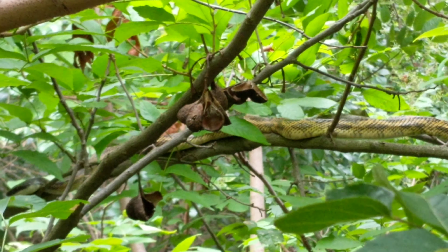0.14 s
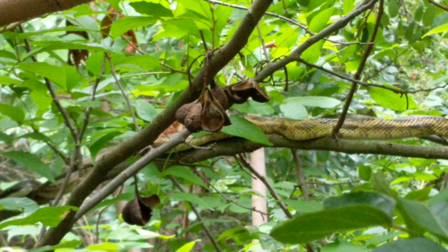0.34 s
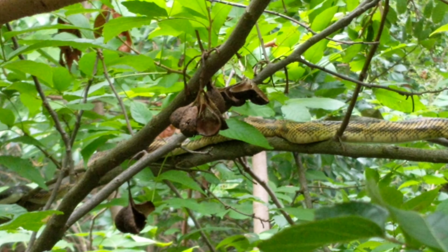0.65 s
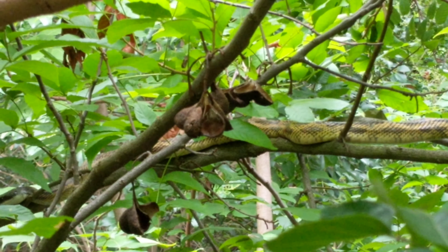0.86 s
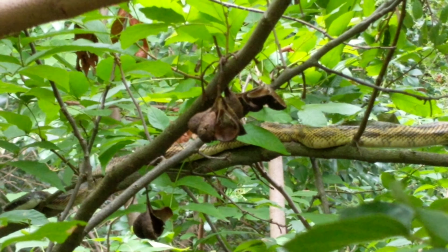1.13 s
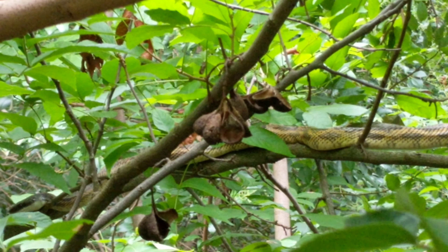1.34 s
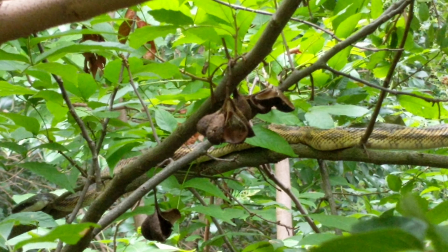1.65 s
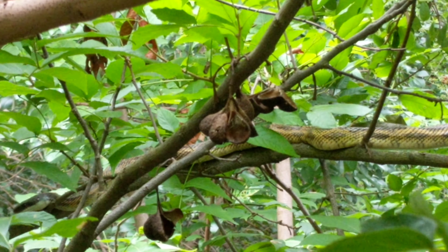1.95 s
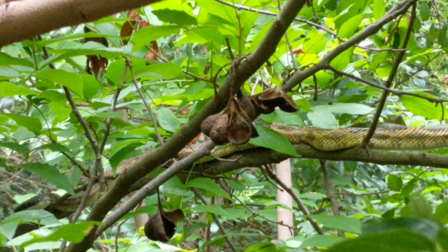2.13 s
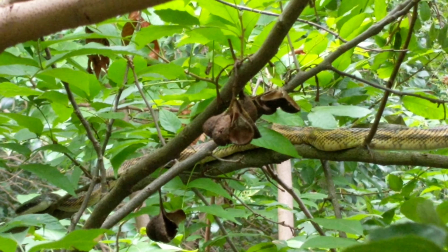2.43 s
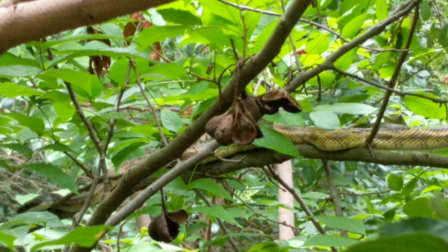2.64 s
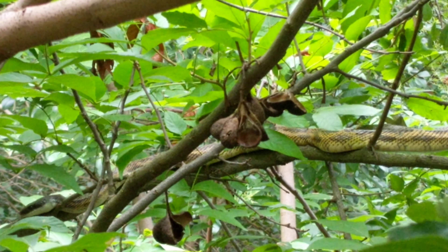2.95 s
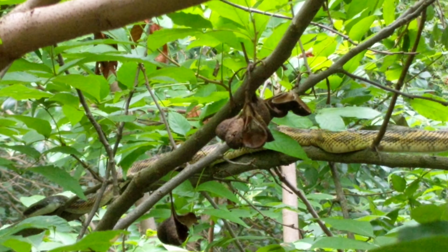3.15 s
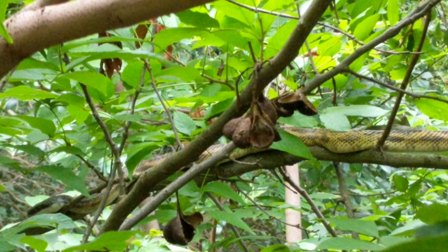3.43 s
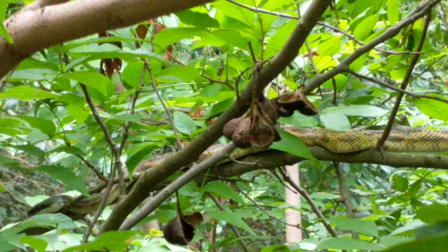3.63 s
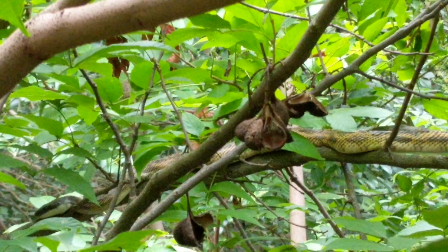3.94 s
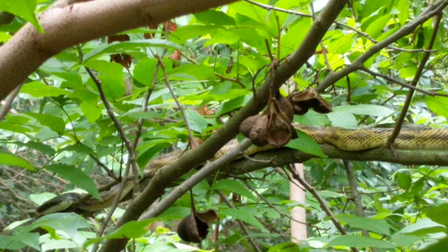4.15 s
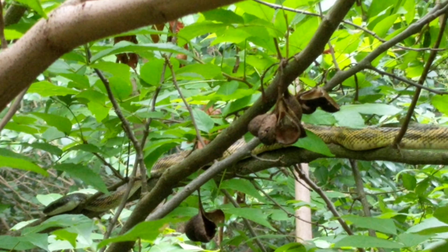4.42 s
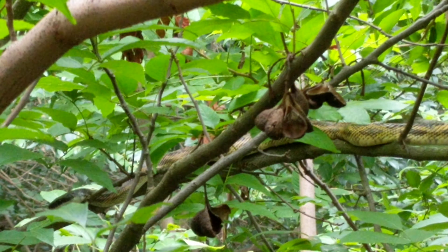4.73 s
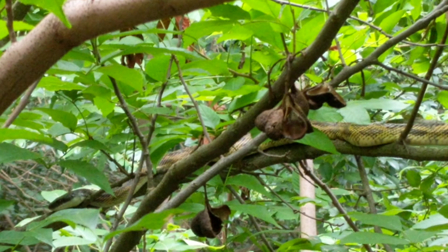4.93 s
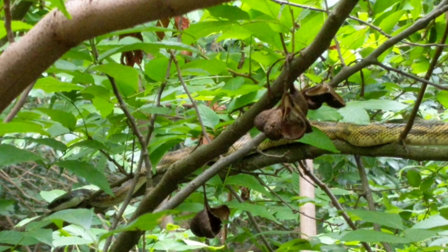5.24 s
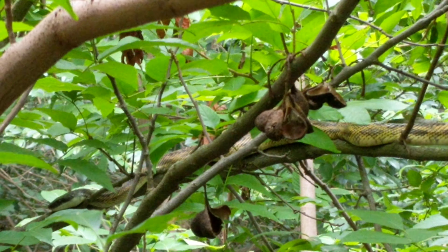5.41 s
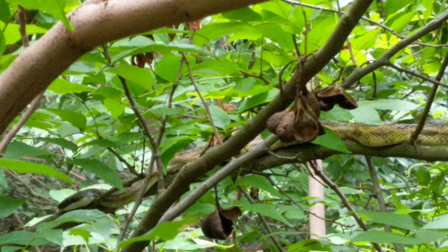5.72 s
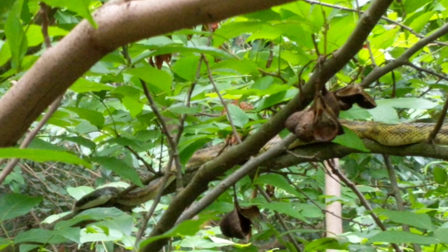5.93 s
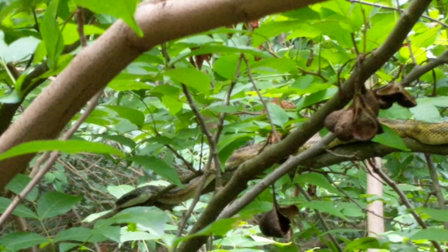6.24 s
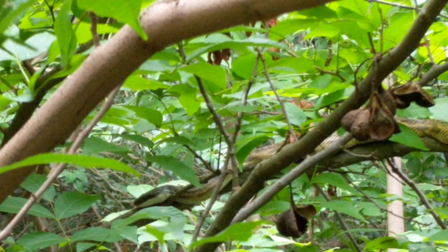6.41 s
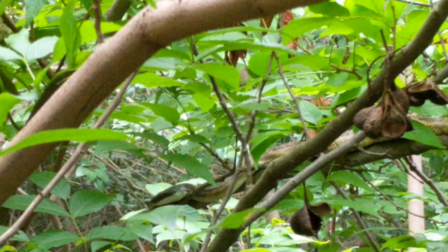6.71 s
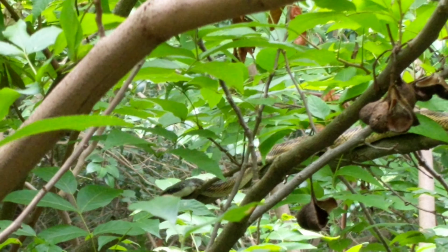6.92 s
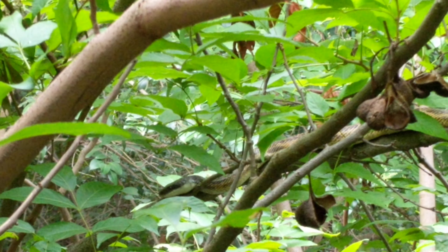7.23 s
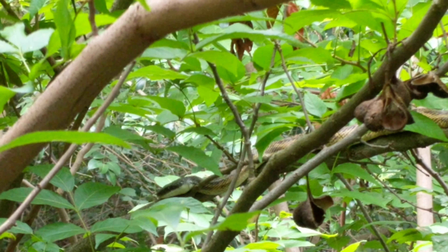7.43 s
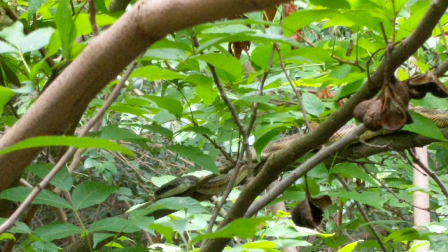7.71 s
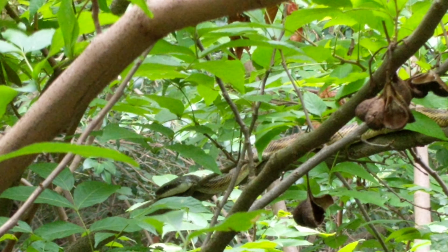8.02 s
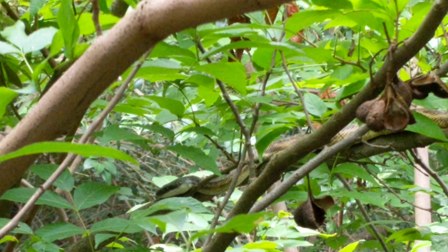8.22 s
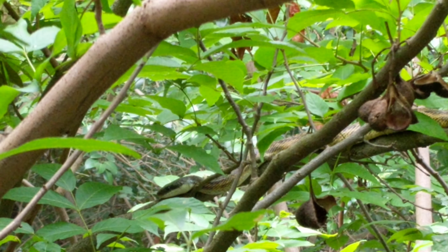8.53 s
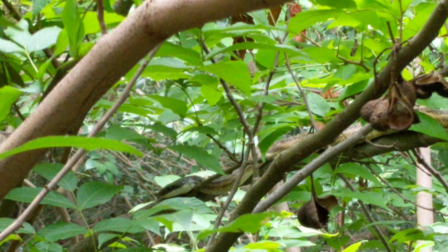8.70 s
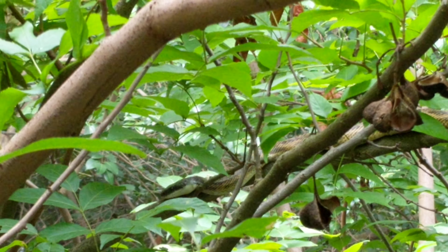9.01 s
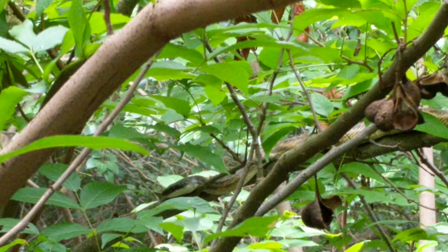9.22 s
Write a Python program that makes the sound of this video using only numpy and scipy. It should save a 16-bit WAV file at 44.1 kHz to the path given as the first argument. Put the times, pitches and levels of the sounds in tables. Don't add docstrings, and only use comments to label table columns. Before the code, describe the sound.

Two jays scold with harsh, raspy screeches in a leafy wood, one near and one farther, over faint distant rumble and insect hiss.

```python
import sys
import numpy as np
from scipy import signal
from scipy.fft import rfft, irfft
from scipy.io import wavfile
from scipy.ndimage import uniform_filter1d

SR = 44100
rng = np.random.default_rng(int(sys.argv[2]) if len(sys.argv) > 2 else 0)


def master(y):
    cut = np.clip(np.atleast_2d(y).T, -1, 1)
    pcm = np.round(cut * 32767)
    wavfile.write(sys.argv[1], SR, pcm.astype(np.int16))


def makeup_ratio(level_db):
    decades = np.asarray(level_db, float) / 20
    return 10 ** decades


N = 412776

# (start [s], length [s], effort [dB], brightness [dB], hoarseness [dB])
NEAR_CALLS = [
    (-0.14, .395, -27, -8, 8.5),
    (0.655, 0.38, -36, 4, 2.5),
    (2.49, .385, -29, -3, -15),
    (7.26, .455, -32, -8, 8.5),
]
FAR_CALLS = [(0.31, .40, -32.5, 1, 0), (0.93, .41, -34, 2, 0), (2.165, 0.41, -33, 0, 0),
             (2.89, 0.42, -31, -1, 0), (3.487, 0.39, -30.5, -2, 0), (4.172, 0.38, -31, -3, 0),
             (5.011, 0.37, -30.5, -6, 0.004), (6.83, .455, -31.5, -2.5, 0), (7.46, 0.4, -30.5, -2.5, 0),
             (8.155, 0.43, -31.5, -2, 0.0023), (8.822, 0.42, -32.5, -1.5, 0.0039)]
# (top pitch [Hz], membranes slacken after [ms], slack pitch [Hz], last pitch [Hz],
# fourth partial's change by the end [dB])
NEAR_TUNES = [(771, 250, 687, 655, -2.5), (756.5, 240, 690, 652, -2.5), (767, 200, 714, 657, -3),
              (772, 150, 712, 676, 3)]
FAR_TUNES = [(749, 145, 645, 597, 1), (758, 150, 650, 592, 3), (742, 115, 640, 580, 6),
             (753, 125, 655, 594, 1.5), (752, 112, 665, 606, 3), (743, 108, 660, 580, -3),
             (744, 112, 650, 585, -10), (734, 130, 635, 593, -12), (757, 175, 730, 632, -5.5),
             (762, 150, 640, 606, -2), (751, 125, 650, 594, -2.5)]
# (first pitch [Hz], rise [s], hold [s], sag [Hz per s], slackening takes [s],
# settling power, closing pitch [Hz], closing lead [s], share of the fade that upper partials gain)
NEAR_PITCH_HABITS = (630, .014, .07, 340, 0.034, 1.05, 618, .04, 0.82)
FAR_PITCH_HABITS = (548, .0145, .055, 380, 0.02225, 1.8, 626, .085, 0.14)
# (time [s], fourth partial [dB], upper partials [dB], odd against even partials [dB],
# rasp [dB])
NEAR_STAGES = [
    [(0, -9, 0, -5, 16), (.014, -1, -1.5, 2, 13), (.045, -4.5, 2, -10.5, 6.5), (.11, 6, 0.1, -8.5, -12)],
    [(0.001, 0.1, -1, -2, -7)],
    [(-.065, -1, -1.5, -4, -5.5), (-.04, -4.5, -2.5, -9, 5.5), (0, -8.5, -10, -4, 6.5)],
]
FAR_STAGES = [
    [(0, -17, -3.5, -19, -6), (.012, -15.5, -11.5, -2, 0), (.026, -6.5, -9.5, -2.5, -3.5), (.05, 0, -13.5, -2, -11.5)],
    [(-.03, -2, -14.5, -16, -10), (.03, -6.5, -11.5, -13, -3), (.11, -9, -8, -7, -7.5)],
    [(-.09, -9.5, -9, 0.1, -5.5), (-.045, -13.5, -14.5, 2.6, 0), (0, -26, -31.5, 3, 0)],
]
# (frequency [Hz], level [dB])
NEAR_THROAT = [(1200.0, -14), (1900.0, -9.5), (2500.0, -2.5), (3200.0, 1.5), (4000.0, -5), (5000.0, -2),
               (6000.0, -4), (7000.0, -7.5), (8500.0, -8), (10500.0, -15.5), (13000.0, -21), (15500.0, -34)]
NEAR_RASP = [(1200.0, -23), (1900.0, -19), (2500.0, -11), (3200.0, -2.5), (4000.0, 0.5), (5000.0, -3.5),
             (6000.0, -6), (7000.0, -6), (8500.0, -1.5), (10500.0, -16), (13000.0, -22), (15500.0, -39)]
FAR_THROAT = [(1200.0, -11), (1900.0, 2), (2500.0, -21), (3200.0, -4.5), (4000.0, -2.5), (5000.0, -1.5),
              (6000.0, -3), (7000.0, -6.5), (8500.0, -10), (10500.0, -17.5), (13000.0, -22), (15500.0, -37)]
FAR_RASP = [(1200.0, -14), (1900.0, -11.5), (2500.0, -1.8), (3200.0, -0.5), (4000.0, -2), (5000.0, -2.5),
            (6000.0, 0), (7000.0, 4), (8500.0, -8), (10500.0, -8), (13000.0, -14), (15500.0, -27)]
# (frequency [Hz], width [Hz], boost [dB])
NEAR_BEAK = [(5542, 470, 11.3), (6660, 770, 8.4)]
FAR_BEAK = [(3550, 130, 0.47), (6040, 290, 1)]
# (frequency [Hz], level [dB])
BEAK_CLOSING = [(1500, 3.5), (2400, 3.5), (3200, 7.5), (4300, 0.5), (5500, -0.5), (7000, -3.5), (12000, 1)]
# (level [dB], ..)
NEAR_PARTIALS = [[1, -1.5, 0, -8.5, -0.78, .4, -2.5, 1.3, -2.2, -1.0, -4.5, 6.2]] * 2
FAR_PARTIALS = [
    [-1.8, 7, 0, 0.7, 1.1, 0.22, -4.5, 6.5, -1.1, 0.66, -.2, 1.3],
    [-0.57, -8, 0, 1.8, 2.3, 0.6, -2, -20, 1.4, 1, -0.37, 0.83],
]
# (start [s], peak [dB], pitch [Hz], lower partial against it [dB])
OPENERS = [(0.3138, -36, 4340, -12), (0.9286, -20, 4600, -22), (2.167, -24.5, 4400, -25),
           (2.8914, -31, 4430, -17), (3.489, -30, 4430, -18), (4.172, -28.5, 4470, -24),
           (5.012, -25, 4430, -12), (6.8332, -35, 4660, -5), (7.463, -25.5, 4530, -13),
           (8.1563, -29.5, 4370, -16), (8.826, -31.5, 4370, -20)]
# (start [s], length [s], pitch [Hz],
# level [dB])
WHISTLES = [(0.545, 0.073, 3130, -36.5), (1.264, 0.077, 3070, -56), (4.473, 0.032, 3010, -44),
            (8.487, 0.048, 3230, -37.5), (3.8, 0.066, 3120, -47), (7.215, 0.055, 3100, -39),
            (7.79, .05, 3180, -40), (9.15, 0.066, 3120, -37)]
# (frequency [Hz], time to fall 60 dB [s])
ECHO_DECAY = [(1500, 0.26), (4000, 0.42), (8000, 0.42), (14000, 0.04)]
# (frequency [Hz], level [dB per Hz])
AIR_COLOUR = [(25, -42), (40, -19), (55, -8.5), (80, -2.5), (110, -2), (200, -5.5), (300, -9.5),
              (420, -13.5), (600, -10.5), (1000, -15.5), (2000, -23), (3300, -28), (7000, -35),
              (16000, -47)]
# (frequency [Hz], level [dB per Hz])
ROAD_COLOUR = [(500, -18), (900, 3.5), (1400, 4.5), (2200, -2), (4000, -25)]
# (time [s], level [dB])
ROAD_LEVEL = [(0, -49.5), (1.7, -53.5), (3.5, -52.5), (4.8, -53), (6, -74), (9.36, -64.5)]
# (frequency [Hz], level [dB])
HUM = [(183.0, -58), (549.1, -65.5)]
# (frequency [Hz], width [Hz], level [dB])
INSECTS = [(5570, 530, -68.5), (9600, 150, -94), (6850, 300, -103)]


def jay(calls, tunes, habits, stages, throat, beak, partials, rasp, jitter, flutter_db, rasp_trim_db, gate,
        release, opening_db):
    voice, hiss = np.zeros(N), np.zeros((2, N))
    k = np.arange(2, 24)[:, None]
    for call, tune in zip(calls, tunes):
        start, end = call[0], call[0] + call[1]
        at = np.arange(max(round(start * SR), 0), min(round((end + .05) * SR), N))
        t = at / SR
        hz, *balance = gesture(np.maximum(t - start, 0), call, tune, habits, stages)
        fourth_db, upper_db, odd_db, rasp_db = balance
        hoarse = makeup_ratio(np.clip(rasp_db - upper_db, -15, 10))
        turns = np.cumsum(hz * (1 + jitter * hoarse * wander(len(t), 320))) / SR
        shut = np.clip((t - end + 0.091) / 0.048, 0, 1)

        colour_db = mouth_colour(k, hz, shut, throat, beak, partials)
        colour_db += opening_db * np.clip(1.5 - (t - start) / 0.021, 0, 1)
        odd_db = np.where(k == 3, np.minimum(0.89 * odd_db, -2.5), odd_db * (k % 2))
        level_db = np.where(k == 4, fourth_db, upper_db + colour_db + odd_db)
        level_db[:2] += 0.28 * (fourth_db - upper_db) - 4.5
        level_db += 1.7 * wander(len(t), 115)
        level_db += flutter_db * np.where(k <= 4, .45, 1) * wander((len(k), len(t)), 23.8)

        rise = np.clip((t - start) / 0.0031, 0, 1) if start > 0 else 1
        shape = rise * np.exp(-np.maximum(t - end + 0.026, 0) / release)
        tones = makeup_ratio(level_db) * np.cos(2 * np.pi * (k * turns + rng.random(k.shape)))
        voice[at] += np.sqrt(2) * tones.sum(0) * shape
        puffs = (1 + gate * np.cos(4 * np.pi * turns)) * rng.standard_normal(len(t))
        rasp_level = makeup_ratio(rasp_db + rasp_trim_db + 1.8 * wander(len(t), 51))
        hiss[:, at] += rasp_level * puffs * shape * rise * [1 - shut, shut]
    return voice + coloured(hiss[0] + coloured(hiss[1], BEAK_CLOSING), rasp)


def mouth_colour(k, hz, shut, throat, beak, partials):
    slow_hz = k * hz[::16]
    colour_db = read(throat, slow_hz) + shut[::16] * read(BEAK_CLOSING, slow_hz)
    for centre_hz, width, db in beak:
        colour_db += db / (1 + (2 * (slow_hz - centre_hz) / width) ** 2)
    colour_db = uniform_filter1d(np.repeat(colour_db, 16, 1), 16)[:, :len(hz)]
    tight, slack = np.pad(partials, [(0, 0), (0, 10)])[:, :, None]
    return colour_db + slack + (tight - slack) * np.clip((hz - 650) / 60, 0, 1)


def gesture(t, call, tune, habits, stages):
    length, effort_db, bright_db, hoarse_db = call[1:]
    top_hz, held_ms, slack_hz, last_hz, fade_db = tune
    first_hz, rise, hold, sag, slacken, power, closing_hz, lead, gained = habits
    held = held_ms / 1000
    tight_hz = top_hz - (top_hz - first_hz) * np.exp(-(t / rise) ** 1.508)
    tight_hz -= sag * np.maximum(t - hold, 0)
    settled = np.clip((t - held) / (length - lead - held), 0, 1)
    loose_hz = last_hz + (slack_hz - last_hz) * (1 - settled) ** power
    hz = tight_hz + (loose_hz - tight_hz) * soft_switch(t - held, slacken)
    hz += (closing_hz - hz) * soft_switch(t - length + lead - .015, .012)

    timed = [np.transpose(rows) + [[moment], [0], [0], [0], [0]]
             for rows, moment in zip(stages, (0, held, length))]
    times, *balance = np.concatenate(timed, 1)
    times = np.maximum.accumulate(times)
    fourth_db, upper_db, odd_db, rasp_db = (np.interp(t, times, column) for column in balance)
    fourth_db = fourth_db + effort_db + fade_db * settled
    upper_db = upper_db + effort_db + bright_db - gained * fade_db * settled
    rasp_db = rasp_db + effort_db + bright_db + hoarse_db * np.clip(t / 0.084, 0, 1)
    return hz, fourth_db, upper_db, odd_db, rasp_db


def openers():
    out, t = np.zeros(N), np.arange(2000) / SR
    shape = np.clip(t / 0.0059, 0, 1) * np.exp(-(t / 0.018) ** 2)
    for start, db, hz, lower_db in OPENERS:
        gliding_hz = hz * (1 + 0.026 * wander(len(t), 270) + 0.31 * t)
        phase = 2 * np.pi * np.cumsum(gliding_hz) / SR
        at = round(start * SR) - 40
        out[at:at + len(t)] += makeup_ratio(db) * shape * (np.sin(phase) + makeup_ratio(lower_db) * np.sin(phase * 3 / 4))
    return out


def whistles():
    out = np.zeros(N)
    for start, length, hz, db in WHISTLES:
        size = round(length * SR)
        level_drift, pitch_drift = wander((2, SR // 4), 50)
        phase = 2 * np.pi * np.cumsum(hz * (1 + 0.017 * pitch_drift)) / SR
        tone = makeup_ratio(db + 2.5 * level_drift) * np.sin(phase)
        out[round(start * SR):][:size] += np.sqrt(2) * tone[:size] * signal.windows.tukey(size, .4)
    return out


def wood(x, wet_db, gap):
    taps = np.zeros(SR)
    at = np.arange(round(gap * SR), SR - 20, 20)
    signs = rng.choice([-1., 1.], len(at))
    taps[at + rng.integers(0, 20, len(at))] = signs
    hz, t, bands = signal.stft(taps, SR, nperseg=256)
    fading = bands * makeup_ratio(-60 * t / read(ECHO_DECAY, hz)[:, None])
    tail = signal.istft(fading, SR, nperseg=256)[1]
    return x + makeup_ratio(wet_db) * signal.fftconvolve(x, tail / np.linalg.norm(tail))[:N]


def air():
    rumble = evened(coloured(rng.standard_normal(N), AIR_COLOUR))
    road = evened(coloured(rng.standard_normal(N), ROAD_COLOUR))
    road_db = np.interp(np.arange(N) / SR, *np.transpose(ROAD_LEVEL))
    return makeup_ratio(-46.5 + .5 * wander(N, 0.67)) * rumble + makeup_ratio(road_db) * road


def hum_and_insects():
    hum = sum(makeup_ratio(db) * fuzzy_line(hz, 7.3) for hz, db in HUM)
    fade_db = -11 * np.arange(N) / N
    return hum + sum(makeup_ratio(db + 4.5 + fade_db) * fuzzy_line(hz, width) for hz, width, db in INSECTS)


def fuzzy_line(hz, width):
    a, phase = wander((2, N), width / 2), 2 * np.pi * hz * np.arange(N) / SR
    return evened(a[0] * np.cos(phase) + a[1] * np.sin(phase))


def wander(shape, hz):
    *rows, size = np.atleast_1d(shape)
    noise = rng.standard_normal((*rows, size // 16 + 200))
    coarse = signal.lfilter(*signal.butter(2, hz, fs=SR / 16), noise)
    coarse = evened(coarse[..., 199:])
    return uniform_filter1d(np.repeat(coarse, 16, -1), 16)[..., :size]


def soft_switch(t, width):
    return .5 + .5 * np.tanh(t / width)


def evened(x):
    return x / np.sqrt(np.mean(x ** 2) + 1e-20)


def read(points, hz):
    f, value = np.transpose(points)
    return np.interp(np.log(hz + 1), np.log(f + 1), value)


def coloured(x, points):
    return irfft(rfft(x) * makeup_ratio(read(points, np.fft.rfftfreq(len(x), 1 / SR))), len(x))


def scene():
    near = jay(NEAR_CALLS, NEAR_TUNES, NEAR_PITCH_HABITS, NEAR_STAGES, NEAR_THROAT, NEAR_BEAK, NEAR_PARTIALS,
               NEAR_RASP, jitter=0.0038, flutter_db=3.65, rasp_trim_db=-1.8, gate=0.5, release=0.049,
               opening_db=-6)
    far = jay(FAR_CALLS, FAR_TUNES, FAR_PITCH_HABITS, FAR_STAGES, FAR_THROAT, FAR_BEAK, FAR_PARTIALS,
              FAR_RASP, jitter=0.0047, flutter_db=4.0, rasp_trim_db=0.77, gate=0.59, release=0.02,
              opening_db=-4.0)
    near = wood(near, wet_db=-12, gap=.006)
    far = wood(far + openers() + whistles(), wet_db=-5.5, gap=.004)
    return np.tile(near + far + air() + hum_and_insects(), (2, 1))


def low_pass(x):
    return signal.sosfilt(signal.butter(12, 16480, fs=SR, output="sos"), x)


def record(dry):
    band_limit = signal.firwin(511, 15780, window=("kaiser", 9), fs=SR)
    mix = signal.oaconvolve(dry, band_limit[None], "same")
    return low_pass(mix)


dry = scene()
out = record(dry)
master(out)
```